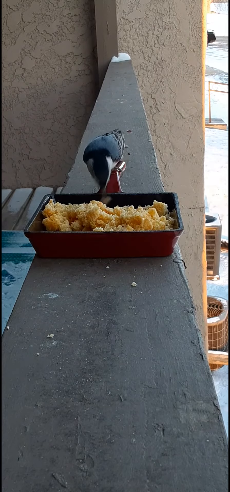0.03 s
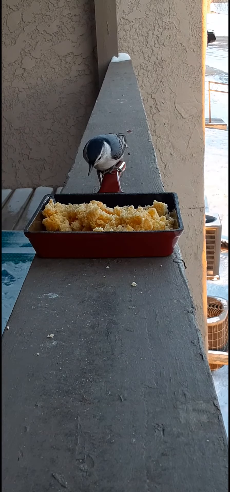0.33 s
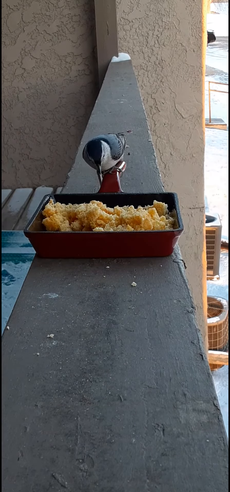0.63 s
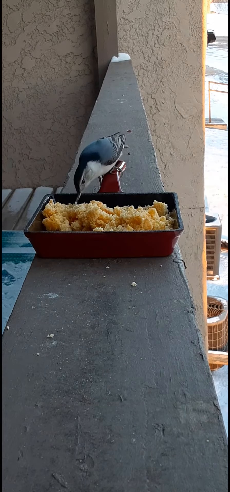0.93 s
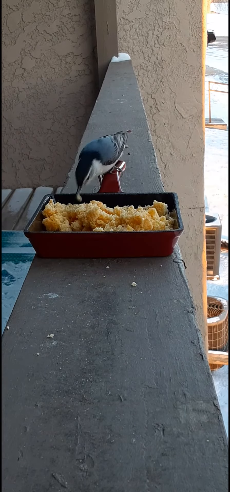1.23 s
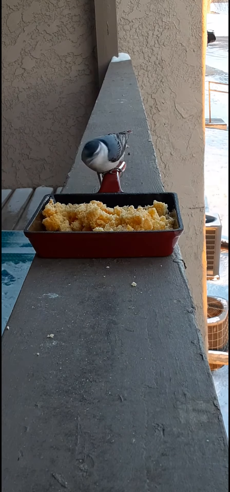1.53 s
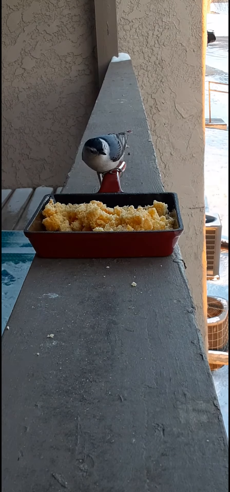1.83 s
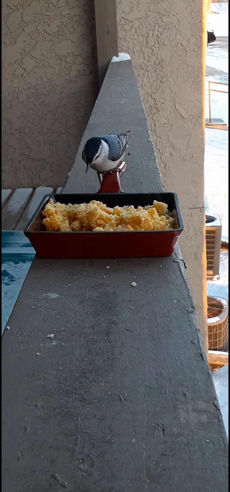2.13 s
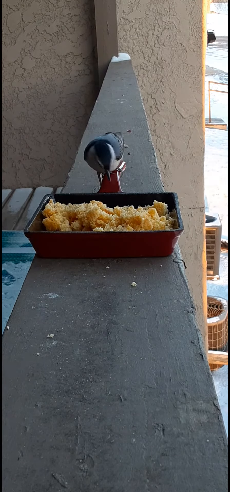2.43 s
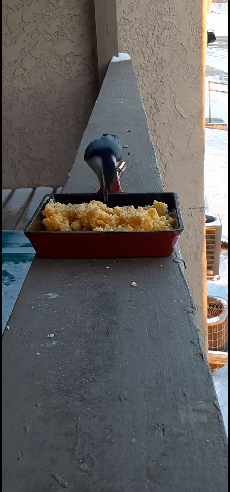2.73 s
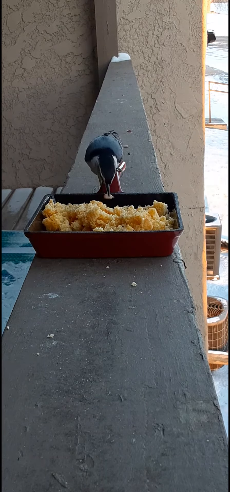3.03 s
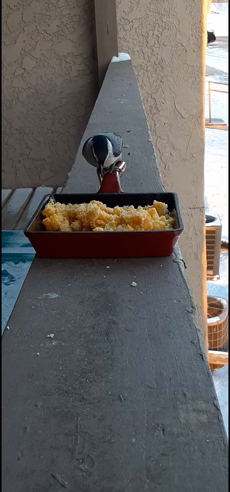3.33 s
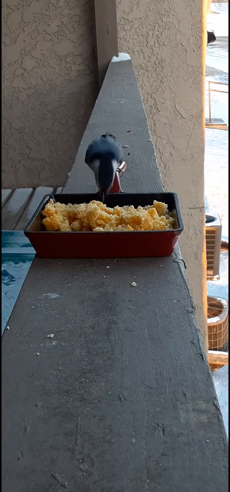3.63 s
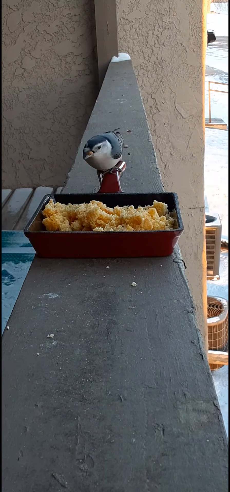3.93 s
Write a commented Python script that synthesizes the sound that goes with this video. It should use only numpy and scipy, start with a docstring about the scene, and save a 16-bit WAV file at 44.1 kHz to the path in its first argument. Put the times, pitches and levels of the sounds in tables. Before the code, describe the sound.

A nuthatch gives one short nasal call over a low town rumble and faint chirps.

```python
"""A porch over steady town rumble, hiss and weak machine drones. Far birds chirp, and a nuthatch's bill
ticks faintly on crumbs and a food tray. Near 1 s come thin rising calls and a falling whistle.
At 1.95 s the nuthatch gives one short nasal note, a stack of overtones; the porch walls answer briefly.
From 2.4 s a far whistle arches, a distant whine swells, and more chirps and pecks follow.
Throughout, the right microphone port resonates in the midrange."""
import sys
import numpy as np
from scipy import signal
from scipy.fft import rfft, irfft, next_fast_len
from scipy.io import wavfile
from scipy.ndimage import map_coordinates

SR = 44100
rng = np.random.default_rng(int(sys.argv[2]) if len(sys.argv) > 2 else 0)


def waveform_to_disk(signal):
    """Save audio, clipped to [-1, 1], as 16-bit WAV at the path in sys.argv[1]."""
    frames = np.transpose(np.atleast_2d(signal))
    scaled = np.clip(frames, -1, 1) * 32767
    samples = np.round(scaled).astype(np.int16)
    wavfile.write(sys.argv[1], SR, samples)


N = 176400
T = np.arange(N) / SR

# Town noise spectra. Each row: frequency in Hz, density in dB per Hz.
RUMBLE_SPECTRUM = [(20, -112), (31, -95), (41, -68.5), (65, -69.5), (112, -63), (145, -73.5), (185, -73),
                   (215, -68), (335, -71.5), (380, -74.5), (480, -78.5), (670, -80), (900, -84.5),
                   (1200, -90.5), (1800, -96.5), (3000, -114), (6000, -130)]
HISS_SPECTRUM = [(500, -110), (1800, -103), (2300, -99), (3200, -108), (3750, -107), (4150, -102),
                 (4700, -108), (8500, -110), (9700, -116), (12500, -111), (15500, -110)]
# Stereo width of the town. Each row: frequency in Hz, side over mid in dB.
TOWN_WIDTH = [(60, -26), (160, -19), (270, -18), (450, -11.5), (740, 2.5), (1220, 1.5), (2000, 0),
              (9000, 0.5)]
# Noise colours. Each row: frequency in Hz, relative level in dB.
RUSH_COLOUR = [(150, -31), (330, 0), (600, -3.5), (900, -14), (1500, -24.5), (3000, -63)]
PECK_COLOUR = [(500, -21), (2500, 9), (4500, 8.5), (8000, 5.5), (15000, 0.5)]
RASP_SHAPE = [(700, -20), (1500, -3), (2600, 0), (3600, -5), (5200, -4), (8000, -12), (10000, -20),
              (15000, -19)]
# Gliding tones. Each row: time in seconds, pitch in Hz, level in dB.
WHINE_TRACK = [(0, 533, -61.5), (1.4, 538.5, -60), (2.36, 536, -59), (2.44, 537, -52.5), (2.95, 539, -48.5),
               (3.3, 539, -49.5), (3.65, 539.5, -50.5), (3.8, 545.6, -63), (3.89, 551, -49),
               (3.925, 543, -61), (3.965, 537, -47), (4, 532, -54)]
FALL_TRACK = [(1.0, 2550, -80), (1.022, 2555, -63), (1.046, 2570, -62), (1.068, 2605, -48.5),
              (1.083, 2600, -50.5), (1.1, 2610, -46), (1.115, 2600, -48), (1.128, 2540, -60),
              (1.145, 2510, -54), (1.18, 2385, -56.5), (1.208, 2300, -58), (1.23, 2250, -68),
              (1.255, 2210, -64), (1.3, 2130, -77)]
ARCH_TRACK = [(2.39, 2020, -83), (2.43, 2130, -72), (2.49, 2480, -73), (2.54, 2870, -72),
              (2.575, 3380, -77), (2.605, 3560, -77.5), (2.635, 3300, -77), (2.665, 2750, -73),
              (2.7, 2500, -75), (2.73, 2450, -85)]
# Machine drones. Each row: pitch in Hz, level in dB.
DRONE_TONES = [(66, -56.5), (171, -56), (258, -62.5), (344, -54.5), (671, -65.5), (863, -67)]
# Far chirps. Each row: start and length in seconds, start and end pitch in Hz, level in dB.
CHIRP_CALLS = [(0.051, 0.11, 2390, 2170, -66), (0.132, .16, 4720, 3580, -71.5),
               (0.238, 0.23, 2336, 2132, -65.5), (1.375, 0.062, 1900, 1854, -66),
               (2.484, .07, 4900, 4170, -70.5), (3.25, 0.13, 4700, 3770, -73),
               (3.357, 0.0226, 3086, 2520, -62.5), (3.365, 0.0305, 2570, 2276, -60)]
# Pecks. Each row: start in seconds, snap level in dB, tray ring level in dB.
PECKS = [(.129, -63, -72), (.131, -58, -74), (.146, -64, -76), (1.585, -63, -90), (2.9285, -61, -80),
         (2.931, -52, -80), (2.999, -64, -80), (3.15, -63, -62)]
# Tray modes. Each row: frequency in Hz, relative level in dB, T60 in seconds.
TRAY_MODES = [(3968, 1.5, 0.064), (4120, -6, .06), (8200, -8.5, 0.11), (8700, -15, .1)]
# Shifting crumbs. Each row: start and length in seconds, level in dB.
CRUMB_RUSTLES = [(0.092, 0.082, -68), (2.918, 0.13, -71.5), (3.136, .06, -75)]
# Thin rising calls. Each row: start and length in seconds, start and top pitch in Hz,
# pitch scatter as a fraction, level in dB, reverb over direct in dB.
SEEP_CALLS = [(0.874, 0.038, 6140, 7640, 0.0096, -50.5, 2), (1.286, .04, 6500, 7300, 0.034, -75.5, 14),
              (1.313, 0.039, 5950, 7400, .075, -74, 15), (1.402, 0.079, 6480, 7300, 0.055, -85.5, 19.5)]
# Nuthatch note. Each row: time in seconds, pitch in Hz, gain in dB, treble lift in dB.
NOTE_TRACK = [(1.951, 812, -26, 0), (1.954, 810, -13, 0), (1.958, 802, -9, 6), (1.961, 792, -8.5, 4),
              (1.964, 781, -2, 4), (1.971, 759, 0, 5), (1.978, 740, -1, -1), (1.985, 726, -4.5, -3),
              (1.988, 724, -22, -3)]
# Its overtone envelope. Each row: frequency in Hz, level in dB.
THROAT_SPECTRUM = [(755, -44.5), (1450, -39.5), (1570, -39), (2270, -44), (3020, -50), (3780, -57.5),
                   (4530, -56), (5290, -56.5), (6040, -61.5), (7500, -67.5), (8300, -65.5), (9300, -74),
                   (13500, -69), (16000, -78)]
# Reach of the lift. Each row: frequency in Hz, fraction of the lift applied.
LIFT_SHARE = [(1600, 0), (2400, .6), (5000, 1)]
# Note sent to the walls. Each row: frequency in Hz, gain in dB.
WALL_SEND = [(700, 4), (1500, -5.5), (2300, 4.5), (3500, 5), (8000, 5.5)]
# The note reaches the left port first. Each row: frequency in Hz, right phase lag in radians.
RIGHT_LAG = [(100, .2), (1500, 3), (2300, 4.4), (3000, 5.8), (3800, 3.3), (4550, 10.2), (5300, 10),
             (6050, 11), (7500, 18.8), (15000, 34)]
# Reverb decay. Each row: frequency in Hz, T60 in seconds.
PORCH_T60 = [(500, 0.12), (3000, 0.25), (12000, 0.15)]
YARD_T60 = [(2000, 0.87), (2600, 0.61), (4000, 0.5), (7500, 0.3)]
# Right port response. Each row: frequency in Hz, gain over the left in dB.
PORT_RESPONSE = [(60, -3), (140, -1.5), (300, 0), (450, 0), (670, 3.5), (790, -0.5), (1150, -1), (1350, 10),
                 (1520, 14), (1750, 5.5), (2000, -7), (2600, 2.5), (3200, -4), (4100, -2), (5000, -4.5),
                 (8500, -2.5)]


def amp(db):
    """Decibels to gain."""
    return 10 ** (np.asarray(db) / 20)


def unit(x):
    """Scale to rms 1."""
    return x / np.sqrt(np.mean(x ** 2) + 1e-20)


def along(points, hz):
    """Interpolate (Hz, value) points on a log axis."""
    knots_hz, values = np.transpose(points)
    return np.interp(np.log(hz + 1), np.log(knots_hz + 1), values)


def track(rows):
    """Pitch, gain and further columns per sample; silent outside the rows."""
    times_s, *columns = np.transpose(rows)
    hz, db, *more = [np.interp(T, times_s, column) for column in columns]
    return hz, amp(db) * (T >= times_s[0]) * (T <= times_s[-1]), *more


def cycle(hz):
    """Running phase of a pitch curve."""
    return 2 * np.pi * np.cumsum(hz) / SR


def wobble(rate_hz):
    """Smooth random curve, rate_hz knots a second."""
    return map_coordinates(rng.standard_normal(int(N * rate_hz / SR) + 4), [T * rate_hz])


def arch(start_s, length_s):
    """Progress 0-1 through an event, and its half-sine envelope."""
    progress = np.clip((T - start_s) / length_s, 0, 1)
    return progress, np.sin(np.pi * progress)


def filtered(x, response):
    """Apply a response given as a function of Hz."""
    size = next_fast_len(N + SR // 2)
    return irfft(rfft(x, size) * response(np.fft.rfftfreq(size, 1 / SR)), size)[..., :N]


def noise(spectrum):
    """Noise with a spectrum in dB per Hz."""
    return filtered(rng.standard_normal(N) * np.sqrt(SR / 2), lambda hz: amp(along(spectrum, hz)))


def wide(spectrum):
    """Stereo noise: alike at both ports in the bass, unrelated higher up."""
    angle = lambda hz: np.arctan(amp(along(TOWN_WIDTH, hz)))
    mid = filtered(noise(spectrum), lambda hz: np.cos(angle(hz)))
    side = filtered(noise(spectrum), lambda hz: np.sin(angle(hz)))
    return np.array([mid + side, mid - side])


def tail(x, space):
    """Diffuse stereo reverb, as strong as x."""
    hz, t, bins = signal.stft(rng.standard_normal((2, SR)), SR, nperseg=256)
    decay = amp(-60 * t / along(space, hz)[:, None])
    response = signal.istft(bins * decay, SR, nperseg=256)[1]
    wet = signal.fftconvolve(x[None], response, axes=1)[:, :N]
    return np.array([unit(side) for side in wet]) * np.std(x)


def placed(x, space, wet_db, left_db=0):
    """Direct sound plus reverb, panned left by left_db."""
    return (x + amp(wet_db) * tail(x, space)) * amp([[left_db / 2], [-left_db / 2]])


def town(flutter_db=1.6, drift_hz=1.5, rush_db=-3, sway_db=0.48):
    """Steady rumble and hiss; a whine, perhaps of tyres, swells with its own rush."""
    hz, gain = track(WHINE_TRACK)
    flutter = amp(flutter_db * wobble(16))
    whine = np.sqrt(2) * flutter * np.sin(cycle(hz + drift_hz * wobble(25.01)))
    rush = amp(rush_db) * unit(wide(RUSH_COLOUR))
    rumble = amp(sway_db * wobble(5.6)) * wide(RUMBLE_SPECTRUM)
    return rumble + wide(HISS_SPECTRUM) + gain * (whine + rush)


def drones(sway_db=2.95, drift_hz=4.02):
    """Weak unsteady tones of far machinery."""
    return sum(amp(db + sway_db * wobble(9.2)) * np.sin(cycle(hz + drift_hz * wobble(20)))
               for hz, db in DRONE_TONES)


def far_chirps(waver=0.032):
    """Faint wavering downward slurs, blurred by the yard."""
    out = np.zeros(N)
    for start_s, length_s, start_hz, end_hz, db in CHIRP_CALLS:
        progress, swell = arch(start_s, length_s)
        hz = (start_hz + (end_hz - start_hz) * progress) * (1 + waver * wobble(300))
        out += amp(db) * swell * np.sin(cycle(hz))
    return placed(out, YARD_T60, wet_db=7)


def pecks(snap_t60_s=0.006, grain_db=4):
    """The bill strikes with a tiny snap and rings the tray; crumbs rustle around it."""
    out = np.zeros(N)
    snap = unit(noise(PECK_COLOUR))
    for start_s, snap_db, ring_db in PECKS:
        age_s = np.maximum(T - start_s, 0)
        ring = sum(amp(ring_db + db - 60 * age_s / t60_s) * np.sin(2 * np.pi * hz * age_s)
                   for hz, db, t60_s in TRAY_MODES)
        out += (T >= start_s) * (amp(snap_db - 60 * age_s / snap_t60_s) * snap + ring)
    grains = unit(noise(PECK_COLOUR) * amp(grain_db * wobble(400)))
    out += grains * sum(amp(db) * arch(start_s, length_s)[1] for start_s, length_s, db in CRUMB_RUSTLES)
    return placed(out, PORCH_T60, wet_db=1.5, left_db=-2)


def seeps(rise_s=0.01, octave_db=-21):
    """Very high calls that shoot up and level off; the later ones are a soft lisp."""
    out = np.zeros((2, N))
    for start_s, length_s, start_hz, top_hz, scatter, db, wet_db in SEEP_CALLS:
        hz = top_hz + (start_hz - top_hz) * np.exp(-np.maximum(T - start_s, 0) / rise_s)
        phase = cycle(hz * (1 + scatter * wobble(900)))
        swell = abs(arch(start_s, length_s)[1]) ** 0.55
        tone = np.sin(phase) + amp(octave_db) * np.sin(2 * phase)
        out += placed(amp(db) * swell * tone, YARD_T60, wet_db)
    return out


def falling_whistle(slide_start_s=1.125, flutter_db=4, echo_s=0.39, echo_db=-23.5):
    """A bird holds a note, then flutters as it slides down; an echo returns across the yard."""
    hz, gain = track(FALL_TRACK)
    sliding = np.clip((T - slide_start_s) / 0.018, 0, 1)
    waver = 0.003 + 0.008 * sliding
    phase = cycle(hz * (1 + waver * wobble(200)))
    flutter = amp(flutter_db * sliding * wobble(130))
    note = np.sqrt(2) * gain * flutter * np.sin(phase)
    echo = filtered(note, lambda f: np.exp(-2j * np.pi * f * echo_s))
    return placed(note + amp(echo_db) * echo, YARD_T60, wet_db=-3.5)


def nuthatch(jitter=0.007, rasp_db=-52, wall_gain_db=-8):
    """A sagging overtone stack that starts hard and bright, with rasp gated once a cycle."""
    hz, gain, lift_db = track(NOTE_TRACK)
    phase = cycle(hz * (1 + jitter * wobble(890)))
    tone = np.zeros(N)
    for k in range(1, 21):
        overtone_db = along(THROAT_SPECTRUM, k * hz) + lift_db * along(LIFT_SHARE, k * hz)
        tone += amp(overtone_db) * np.cos(k * phase)
    rasp = unit(noise(RASP_SHAPE) * (1 + np.cos(phase))) * amp(rasp_db + lift_db)
    note = np.sqrt(2) * gain * (tone + rasp)
    walls = tail(filtered(note, lambda f: amp(along(WALL_SEND, f))), PORCH_T60)
    right = filtered(note, lambda f: np.exp(-1j * along(RIGHT_LAG, f)))
    return np.array([note, right]) + amp(wall_gain_db) * walls


def arching_whistle(waver=0.02):
    """A far bird glides up and down again."""
    hz, gain = track(ARCH_TRACK)
    phase = cycle(hz * (1 + waver * wobble(200)))
    return placed(np.sqrt(2) * gain * np.sin(phase), YARD_T60, wet_db=6)


def scene():
    """Birds over the town."""
    calls = nuthatch() + falling_whistle() + arching_whistle() + seeps() + far_chirps()
    return calls + pecks() + town() + drones()


def record(dry, top_hz=15750):
    """The right port colours its channel; both are cut above top_hz."""
    right = filtered(dry[1], lambda hz: amp(along(PORT_RESPONSE, hz)))
    return filtered(np.array([dry[0], right]), lambda hz: hz < top_hz)


dry = scene()
out = record(dry)
waveform_to_disk(out)
```